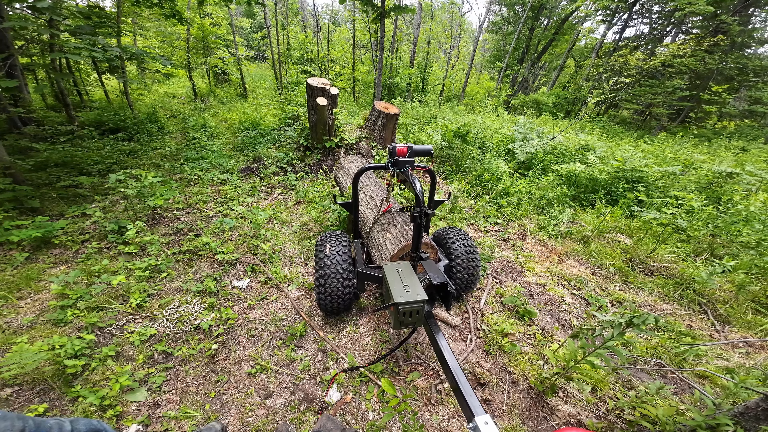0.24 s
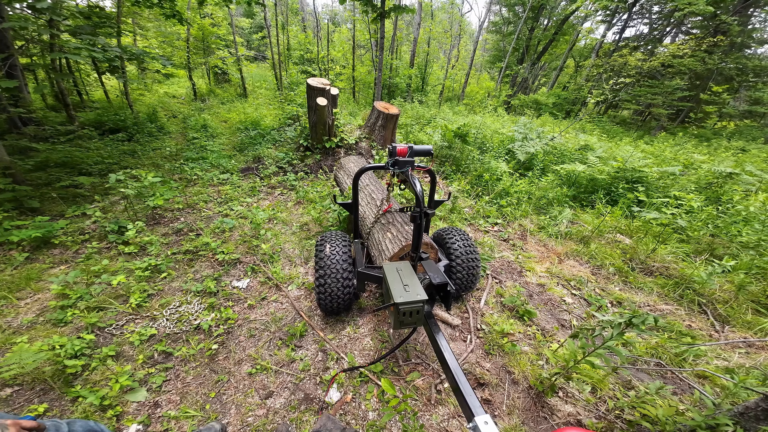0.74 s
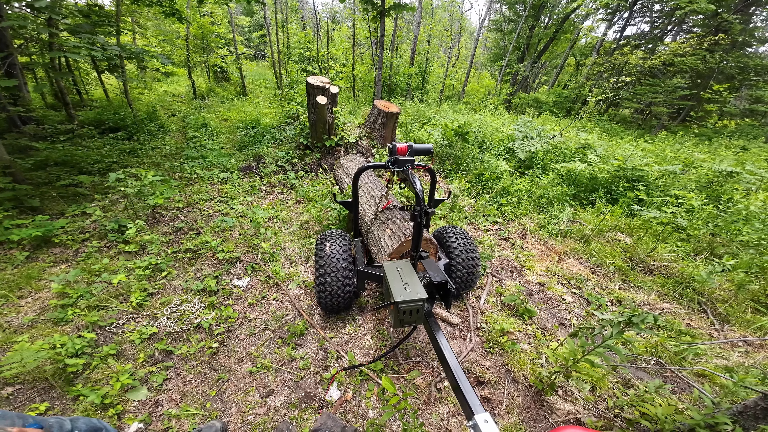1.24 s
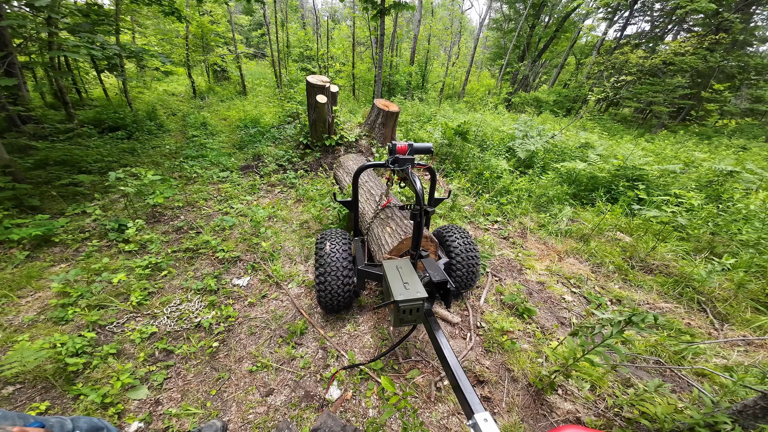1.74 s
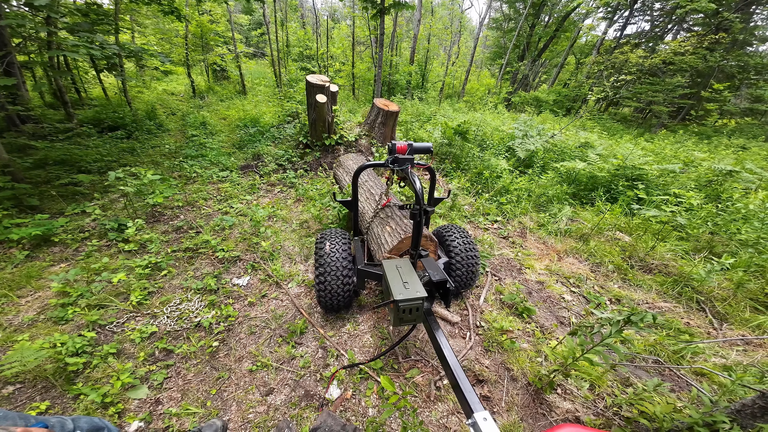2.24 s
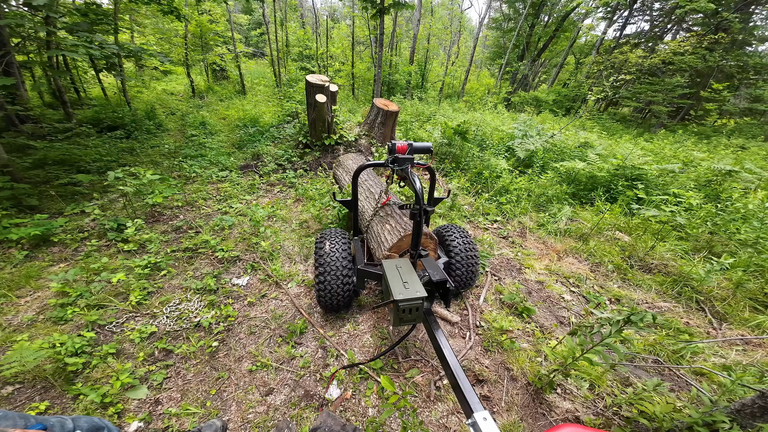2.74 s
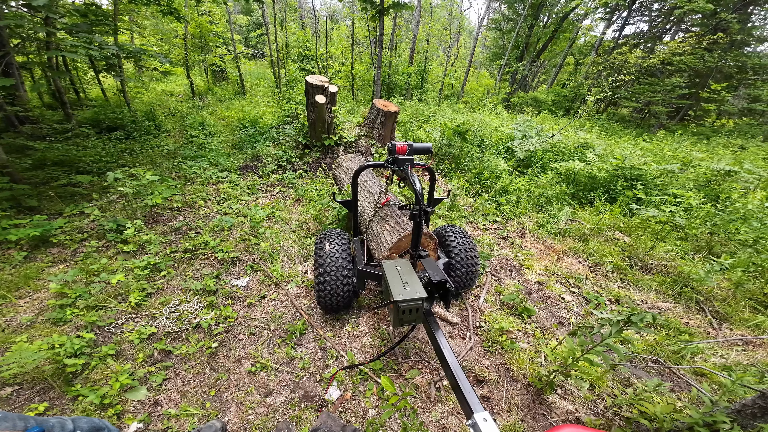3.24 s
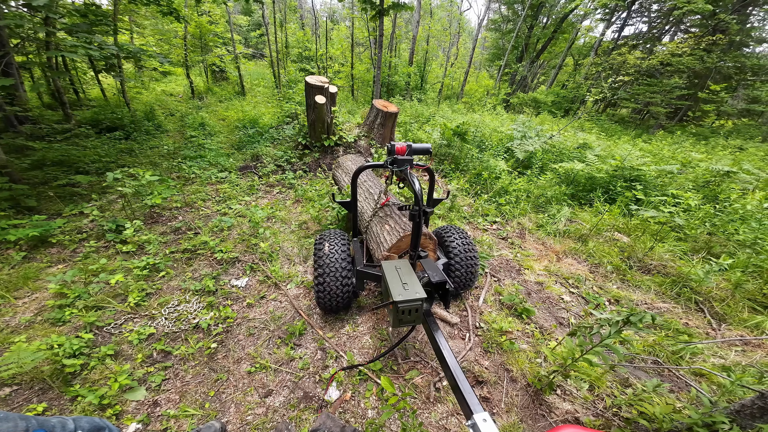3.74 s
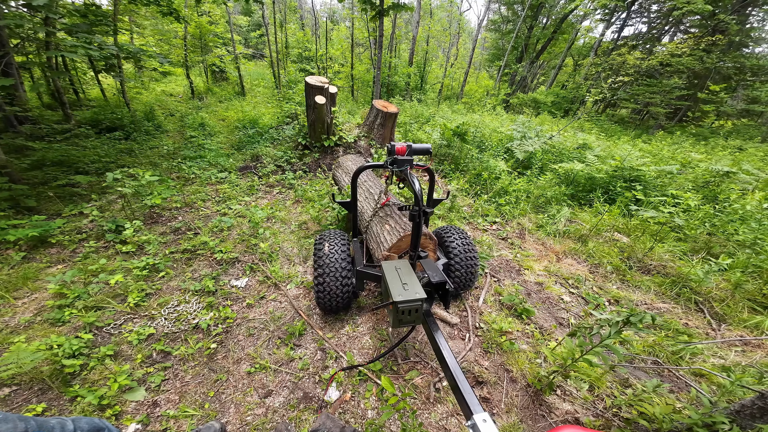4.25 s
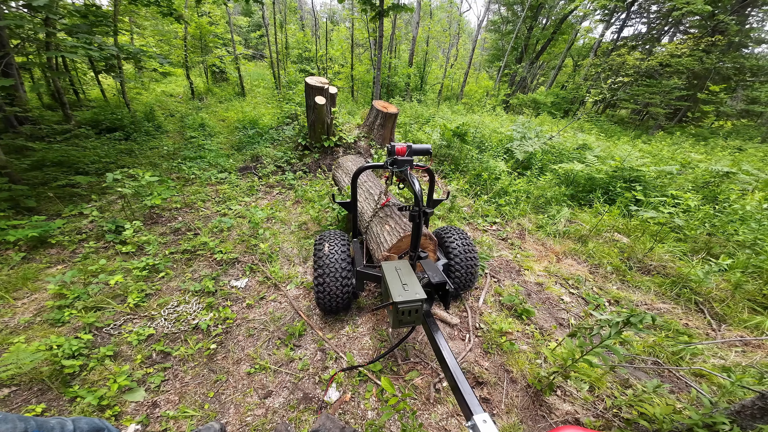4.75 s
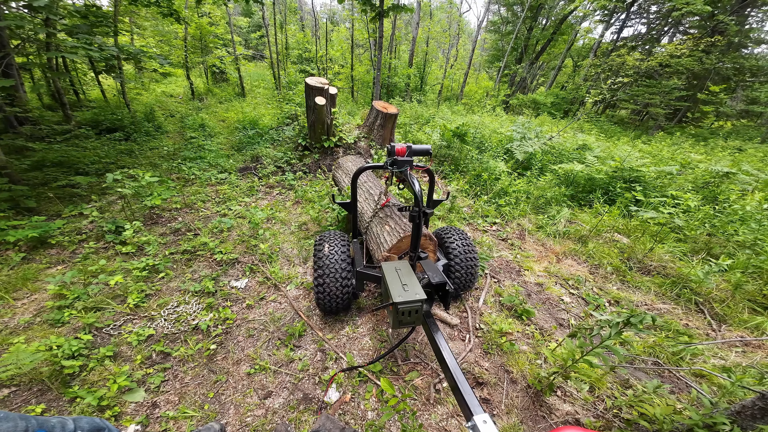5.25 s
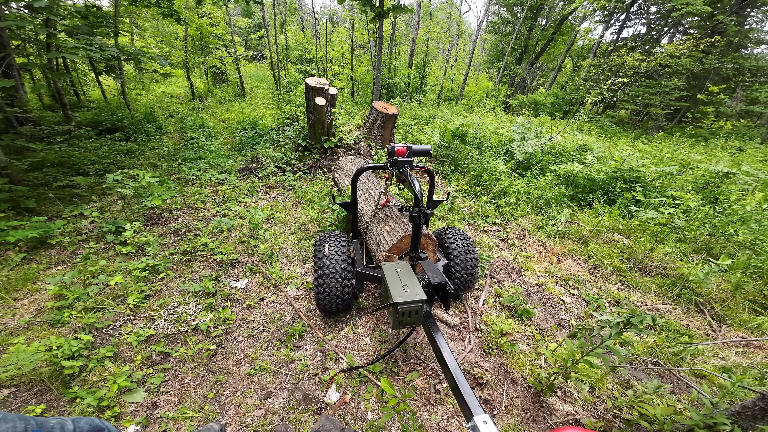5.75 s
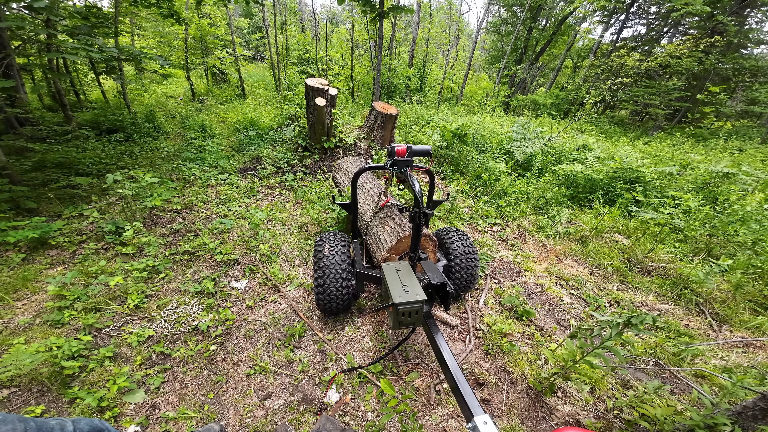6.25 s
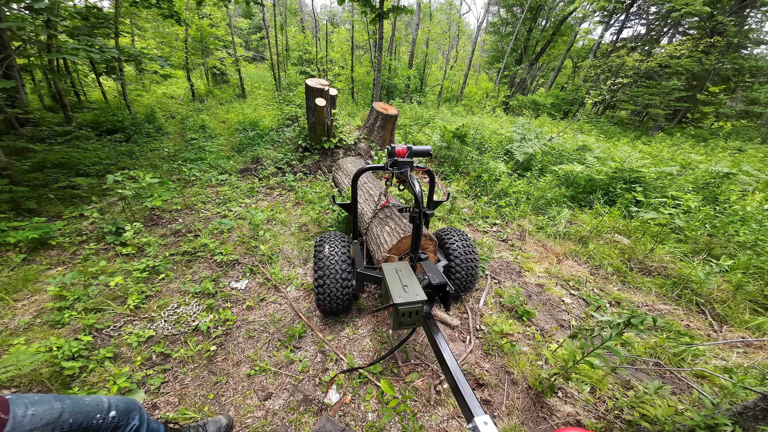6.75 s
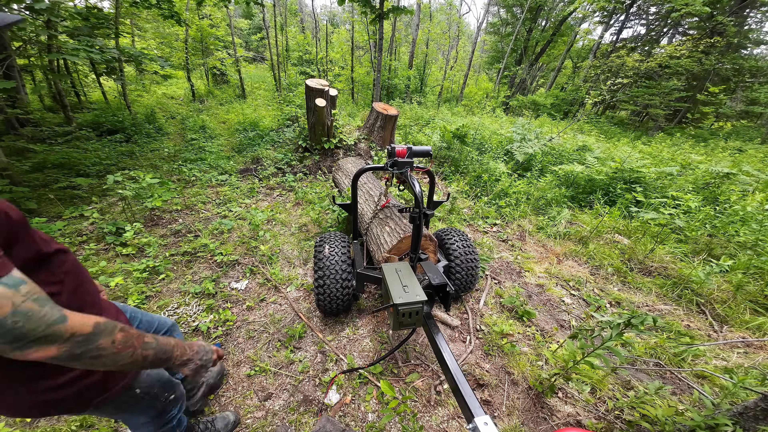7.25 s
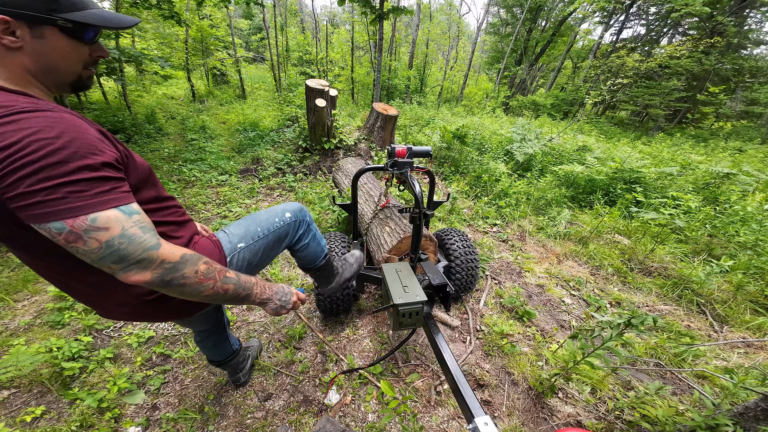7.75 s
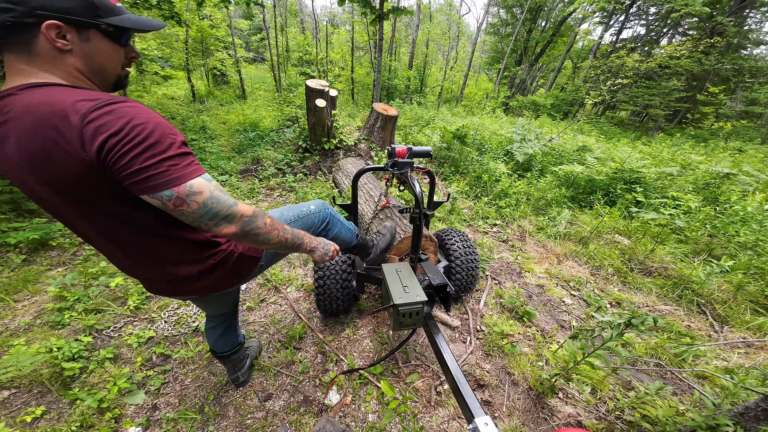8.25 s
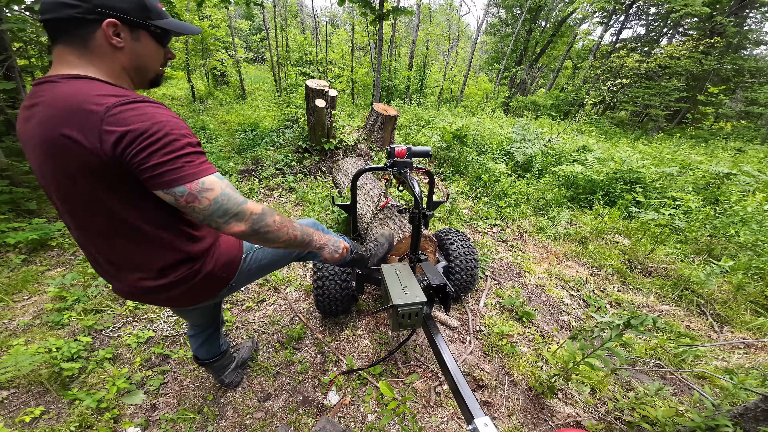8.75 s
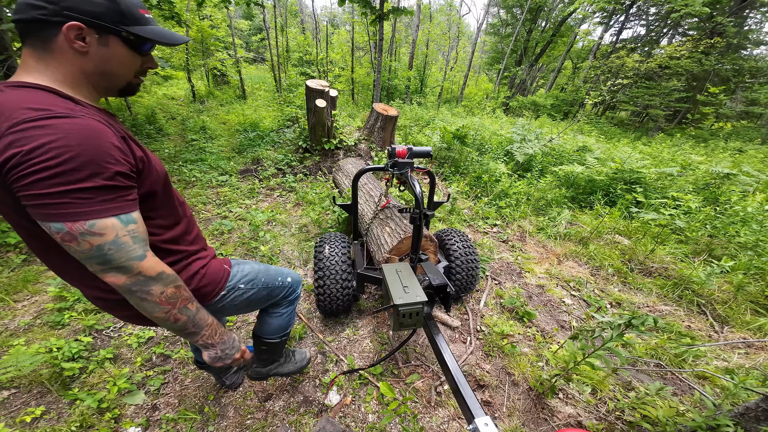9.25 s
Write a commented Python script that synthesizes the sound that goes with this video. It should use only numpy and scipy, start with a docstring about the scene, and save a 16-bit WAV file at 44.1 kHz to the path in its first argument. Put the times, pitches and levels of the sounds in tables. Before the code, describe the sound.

Quiet woodland with a very faint steady hush, heard close in dry stereo. A grinding electric winch is already running and stops at 0.4 s, with log knocks and a momentary dip in level. Four more pulls follow at about 0.85-1.6, 2.2-2.9, 3.5-4.0 and 5.2-5.7 s, each preceded by a switch click. The gritty geared whir wavers and sags under load, lowest in the last pull, with deep shaft booms, wooden clonks around 1.3-1.5 s and soft trailer rocking at starts and stops. Tiny cable ticks dot the pauses. A low hum lingers from 5.8 s and fades; a click comes at 6.5 s and a faint fly buzz at 6.6. From 7.0 s steps crackle in dry litter. Boot knocks cluster at 8.1-8.3 s, the strongest hollow thud lands at 8.7, and smaller knocks, ticks and scuffs continue to 9.5.

```python
"""A grinding winch is already hauling a log onto a small trailer; five short pulls are heard, the motor sagging under load.
Gear noise, periodic with the shaft turn, excites the housing and steel frame; the hum of the shaft booms.
Struck modes make the knocks of the log, noise bursts the clicks of switch and cable, filtered noise the rocking.
A low hum lingers after the last pull and a harmonic buzz is a passing fly; then someone steps through
dry litter, heard as grains of noise, and shoves the log with a boot, so that it knocks in the frame."""
import sys
import numpy as np
from scipy import signal
from scipy.fft import rfft, irfft, next_fast_len
from scipy.io import wavfile
from scipy.ndimage import uniform_filter1d, map_coordinates

SR = 44100
rng = np.random.default_rng(int(sys.argv[2]) if len(sys.argv) > 2 else 0)


def inscribe(sig):
    """Save sig as 16-bit PCM at rate SR to the path in sys.argv[1].

    A 1-D sig is mono; a 2-D sig holds one channel per row.
    Samples are clipped to [-1, 1] before scaling.
    """
    pcm = np.round(np.clip(np.atleast_2d(sig).T, -1, 1) * 32767)
    wavfile.write(sys.argv[1], SR, pcm.astype(np.int16))


N = 419214
TIME = np.arange(N) / SR
STRIKE = SR // 2  # samples in one struck sound


def undb(db):
    """Level to amplitude: 20 dB is a factor of ten."""
    return 10 ** (np.asarray(db) / 20)


def unit(x):
    """Normalization to a root-mean-square value of 1."""
    return x / np.sqrt(np.mean(x ** 2))


def peak(x, db):
    """Normalization to a peak level."""
    return x * undb(db) / np.abs(x).max()


def colour(x, points):
    """Spectral shaping: gains of (pitch_hz, level_db) points, joined on a logarithmic frequency axis."""
    hz, db = np.transpose(points)
    size = next_fast_len(x.shape[-1])
    f = np.maximum(np.fft.rfftfreq(size, 1 / SR), 1)
    gain = undb(np.interp(np.log(f), np.log(hz), db))
    return irfft(rfft(x, size) * gain, size)[..., :x.shape[-1]]


def band(x, lo_hz, hi_hz, order=4):
    """Butterworth band-pass: a flat passband between two slopes."""
    edges = [lo_hz, min(hi_hz, SR / 2 - 1)]
    return signal.sosfilt(signal.butter(order, edges, "band", fs=SR, output="sos"), x)


def resonate(x, hz, width_hz):
    """Simple resonance: a second-order peak with gain 1 at its centre."""
    return signal.lfilter(*signal.iirpeak(min(hz, SR / 2 - 1), hz / width_hz, fs=SR), x)


def walk(rate):
    """Slow fluctuation: random steps at a rate in Hz, smoothed by a moving average, rms 1."""
    k = int(SR / rate)
    steps = np.repeat(rng.standard_normal(N // k + 1), k)
    return unit(uniform_filter1d(steps, k)[:N])


def grains(spread_db, channels=1):
    """Granular noise: dense tiny impacts of very unequal size."""
    size_db = spread_db * np.repeat(rng.exponential(size=(channels, N // 16 + 1)), 16, axis=1)[:, :N]
    return unit(rng.standard_normal((channels, N)) * undb(np.minimum(size_db, 30)))


def fade(t60):
    """Exponential decay: a fall of 60 dB in t60 seconds."""
    return undb(-60 * TIME[:STRIKE] / t60)


def ring(modes, detune=0.043):
    """Modal synthesis: damped sines whose level, pitch and sign vary a little from blow to blow."""
    out = np.zeros(STRIKE)
    for hz, db, t60 in modes:
        harder, sharper, way = rng.standard_normal(3)
        wave = np.sin(2 * np.pi * hz * (1 + detune * sharper) * TIME[:STRIKE])
        out += np.sign(way) * undb(db + 2 * harder) * fade(t60) * wave
    return out


def swell(start, length, attack_s, release_s):
    """Exponential envelope: it rises towards its start, holds and dies away."""
    before = np.minimum(TIME - start, 0)
    after = np.maximum(TIME - start - length, 0)
    return np.exp(before / attack_s - after / release_s)


def stereo(mid, side):
    """Sum and difference: left and right from mid and side."""
    return np.array([mid + side, mid - side])


def shaken(x, lean=0.78, twist=0.78):
    """Phase difference: vibration through the tow bar, stronger on the left and out of step on the right."""
    quadrature = signal.hilbert(x, next_fast_len(len(x))).imag[:len(x)]
    return stereo(x, lean * x + twist * quadrature)


def leaning(x):
    """Level difference: side signal of a trailer sound; its lows lean left, the rest stays nearly central."""
    return undb(1) * colour(x, [(200, -9), (290, -7.0), (420, -12.5), (700, -30)])


def add(out, s, sound):
    """Superposition: mix a sound in at a time."""
    i = int(max(s, 0) * SR)
    out[:, i:i + sound.shape[-1]] += sound[..., :N - i]


# spectrum of the still air of the wood: pitch_hz, level_db
AIR_TONE = [(12, -35), (20, -2), (33, 11), (80, -3.5), (95, -8.5), (129, -18.5), (161, -24.5), (352, -25.5),
            (788, -33.5), (857, -32), (1630, -37), (3350, -41), (15500, -55.5)]


def air(air_db=-62, width=0.46):
    """Steady broadband noise: the faint even hush of the wood."""
    mid, side = colour(rng.standard_normal((2, N)), AIR_TONE)
    gain = undb(air_db + 0.48 * walk(1.614)) / np.std(band(mid, 168, 15000))
    return band(stereo(mid, width * side), 113, 16000, order=2) * gain


# power to the motor, one row for each pull: on_s, off_s, settling_db (drum after the brake), growl_db, hum_db,
# tube_db (ring of the frame's tube), start_rock_db, stop_rock_db
WINCH_PULLS = [(-.1, 0.399, -13.5, -35, -31.5, -57, -29, -35),
               (0.845, 1.613, -16, -35, -30.5, -53, -27.5, -30.5),
               (2.183, 2.878, -16.5, -37.5, -28.5, -58, -28.5, -31),
               (3.526, 4.022, -12, -36, -33.5, -60.5, -33.5, -33.5),
               (5.229, 5.712, -1.5, -35.5, -31.5, -68, -39.5, -32.5)]
# motor speed as the load comes and goes, one curve for each pull: time_s, turns_hz
SPEEDS = [
    [(0.0, 132.5), (0.044, 133.9), (0.098, 121.7), (0.102, 121.5), (0.172, 135.4), (0.222, 133),
     (0.28, 135.7), (0.296, 135.6), (0.346, 126.5), (0.41, 126.7)],
    [(0.87, 132.3), (0.904, 135.5), (0.986, 119.4), (1.036, 136), (1.16, 151.1), (1.334, 121.9),
     (1.382, 144.1), (1.496, 141.2), (1.566, 118), (1.62, 123.7)],
    [(2.21, 122.3), (2.292, 122.1), (2.334, 129.5), (2.47, 115.3), (2.538, 97.9), (2.606, 110.6),
     (2.702, 97.9), (2.772, 122.2), (2.824, 123.5), (2.89, 137.8)],
    [(3.56, 154.2), (3.59, 151.2), (3.606, 149.2), (3.648, 125.8), (3.752, 107.2), (3.78, 103.2),
     (3.854, 111), (3.914, 109.1), (3.968, 109.5), (4.03, 103.2)],
    [(5.25, 153.5), (5.288, 151.4), (5.3, 144.6), (5.346, 112.2), (5.362, 104.8), (5.464, 94.1),
     (5.516, 86.75), (5.602, 87.8), (5.65, 91.84), (5.72, 87.2)],
]
# booms of the frame, where the labouring motor shakes it into resonance: centre_s, half_length_s, level_db
BOOMS = [(0.162, 0.017, -27.5), (1.635, 0.033, -23.5), (2.325, 0.036, -28), (2.547, 0.031, -20.5),
         (2.669, 0.068, -26.5), (3.778, 0.042, -21), (3.933, .04, -14.5), (4.023, 0.06, -24.5),
         (5.402, 0.028, -14.5), (5.474, 0.023, -15.5)]
CRUISE_HZ, GEAR_DB, GEAR_DB_PER_OCTAVE = 116.9, -31, 17.5  # gear level at cruising speed, and its slope
JOLT_DB, JOLT_S = 7, 0.04  # extra growl at the start of a pull, and its decay time


def drive(rise_s=0.039, brake_s=0.014, coast_s=0.061, hum_rise_s=0.097, hum_fall_s=0.058, hiss_follow=0.78):
    """Speed-dependent excitation: motor speed and gains of gears, growl, hiss and hum; a fast brake, slower settling."""
    speed = np.interp(TIME, *np.transpose([point for pull in SPEEDS for point in pull]))
    running, growling, shaking = np.zeros((3, N))
    for on, off, settling_db, growl_db, hum_db, *_ in WINCH_PULLS:
        since, after = np.maximum(TIME - on, 0), np.maximum(TIME - off, 0)
        stopping = np.maximum(np.exp(-after / brake_s), undb(settling_db) * np.exp(-after / coast_s))
        power = np.minimum(since / rise_s, 1) ** 2 * stopping
        running += power
        growling += power * undb(growl_db + JOLT_DB * np.exp(-since / JOLT_S))
        shaking += np.minimum(since / hum_rise_s, 1) * np.exp(-after / hum_fall_s) * undb(hum_db)
    gear_db = GEAR_DB + GEAR_DB_PER_OCTAVE * np.log2(speed / CRUISE_HZ)
    gears = running * undb(gear_db)
    # the brushes keep hissing when the load slows the gears
    hiss = running * undb(hiss_follow * gear_db)
    growl = growling * undb(2 * walk(20))
    booms = sum(undb(db) * np.exp(-((TIME - s) / half_s) ** 2) for s, half_s, db in BOOMS)
    hum = shaking * undb(3 * walk(21.99)) + booms
    return speed, gears, growl, hiss, hum


def teeth(turns, memory=0.919, size=320):
    """Near-periodic excitation: the pattern of tooth impacts returns on each shaft turn and slowly changes."""
    fresh = rng.standard_normal((int(turns[-1]) + 2, size))
    pattern = signal.lfilter([1], [1, -memory], fresh, axis=0).ravel()
    return unit(map_coordinates(pattern, [turns * size], order=3))


# tone of the gearbox: pitch_hz, level_db
GEARBOX_TONE = [(100, -46), (170, 7), (253, -1), (311, -7), (538, 1.5), (756, 3.5), (930, -3), (1230, -3),
                (2020, -6.5), (2180, -3), (2530, -10), (3230, -12), (4540, -24), (10000, -39.5),
                (15500, -49)]
# resonances of the gear housing: pitch_hz, width_hz, level_db
HOUSING_MODES = [(430, 86, -1.5), (542, 23, 0), (631, 22, -32), (800, 140, -8), (1280, 22, -14),
                 (1333, 8, 2.5), (1768, 7.8, 2.5), (2180, 35, 3.5), (2260, 11, -1), (2745, 16, -6),
                 (3150, 86, -1.5), (3340, 19, 2), (3860, 39, 4.5), (5040, 190, 2.5), (5870, 170, 0),
                 (6200, 69, 4.5), (7500, 200, -1), (10020, 510, 3.5)]
# long rings of the steel frame: pitch_hz, level_db, t60_s
FRAME_MODES = [(845.9, -10, 2.0), (1286, -3, 0.59), (1670, -32, 0.47), (2215, -6, 0.4), (2720, -7, 0.46)]


def winch(growl_rough=0.66, gear_rough=0.86, throb=0.17, hiss_db=-22, frame_db=-23.5, hiss_width=0.27, gear_width=0.32):
    """Source and resonator: teeth and brush hiss sound through the housing; the unbalanced shaft shakes the frame."""
    speed, gear_gain, growl_gain, hiss_gain, hum_gain = drive()
    turns = np.cumsum(speed * (1 + 0.00503 * walk(50))) / SR
    shaft = np.sin(2 * np.pi * turns)
    mesh = teeth(turns)
    # sliding contact adds grit that swells once a turn
    scrape, scrape_side = grains(2.08, channels=2) * (1 + throb * shaft)
    sources = np.array([mesh + growl_rough * scrape, mesh + gear_rough * scrape, scrape, scrape_side])
    sources = colour(sources, GEARBOX_TONE)
    body = sources + sum(undb(db) * resonate(sources, hz, width) for hz, width, db in HOUSING_MODES)
    growl = growl_gain * unit(band(body[0], 204.0, 800))
    gears = undb(walk(35)) * gear_gain * unit(band(body[1], 1032, 4090))
    hiss, hiss_side = undb(hiss_db + 1.95 * walk(45)) * hiss_gain * unit(band(body[2:], 5260, 23300))
    # the frame rings on after the motor stops; bandwidth follows from t60
    frame = sum(undb(db) * resonate(growl + gears, hz, np.log(1000) / np.pi / t60) for hz, db, t60 in FRAME_MODES)
    frame = unit(frame) * np.std(gears) * undb(frame_db)
    gear_side = colour(band(body[3], 158, 3600), [(200, 18), (450, -14), (1200, -6.5), (4000, 5)])
    # the two microphones agree least in the deep growl and the high hiss
    side = gear_width * gear_gain * unit(gear_side) + leaning(growl)
    side += hiss_width * colour(hiss_side, [(4500, -7.5), (8000, 4), (14000, 7)])
    return stereo(growl + gears + hiss + frame, side) + shaken(hum_gain * shaft)


def tube(hz=420, build_s=.15, decay_s=.27):
    """Resonant build-up and decay: the frame's lowest note grows during each pull and rings into the pause."""
    level = sum(undb(tube_db) * swell(off, 0, build_s, decay_s) for _, off, *_, tube_db, _, _ in WINCH_PULLS)
    note = unit(np.sin(2 * np.pi * hz * TIME)) * level * undb(walk(6.1))
    return stereo(note, leaning(note))


# spectrum of the rocking trailer: pitch_hz, level_db
ROCK_TONE = [(25, 12), (42, 1), (55, 10.5), (67, 8.5), (80, 2.5), (92, 10.5), (120, 2.5), (170, -14.5),
             (300, -16), (600, -54)]


def rocking(rock_db=-4, sway_db=-6, rest_db=-51, build_s=0.054, settle_s=0.33, knock_db=-6, knock_settle_s=0.23):
    """Energy addition: starts, stops and knocks set the trailer rumbling on its tyres; the sway is in antiphase."""
    pushes = []
    for on, off, *_, start_db, stop_db in WINCH_PULLS:
        for s, db in ((on, start_db), (off, stop_db)):
            pushes.append(undb(db) * swell(s + build_s, 0, build_s, settle_s))
    for s, *_, thud_db in KNOCKS:
        pushes.append(undb(thud_db + knock_db) * swell(s, 0, 0.021, knock_settle_s))
    motion = np.sqrt(undb(rest_db) ** 2 + sum(push ** 2 for push in pushes))
    rumble, apart = unit(colour(rng.standard_normal((2, N)), ROCK_TONE)) * motion * undb(rock_db)
    sway = unit(band(rng.standard_normal(N), 22, 66, order=2)) * motion * undb(sway_db)
    return shaken(rumble, lean=1.0, twist=1.0) + stereo(0, sway + apart)


# knocks of log and boot, levels relative within each part: start_s, clonk_db, clonk_centre_hz, crack_db, thud_db
KNOCKS = [(.11, -31.5, 268, -50, -33), (0.402, -29.5, 341.3, -40, -29.5), (1.27, -18.5, 227.4, -50, -33.5),
          (1.391, -24.5, 226, -50, -44), (1.526, -25, 240.3, -50, -37), (2.335, -27, 245.6, -50, -32),
          (3.049, -45, 279.2, -70, -45), (4.185, -46.5, 220.7, -52, -41.5), (8.087, -29, 474, -38.5, -32.5),
          (8.149, -45, 500, -36.5, -31), (8.191, -22, 545, -38.5, -25), (8.214, -28.5, 440, -44, -24),
          (8.259, -36, 232, -49, -25), (8.626, -33.5, 445, -43, -32), (8.701, -14, 392, -33.5, -18),
          (8.728, -24.5, 300, -53, -18.5), (8.801, -31, 304, -49, -51), (8.884, -35.5, 647, -39.5, -34),
          (8.915, -31, 278, -46.5, -26), (8.978, -36, 355, -36, -33), (9.029, -25.5, 556, -58, -43),
          (9.082, -31, 370, -42, -37.5), (9.419, -34, 638, -50, -46), (9.447, -27, 400, -39.5, -30.5)]
# modes of the log in its cradle: pitch_hz, level_db, t60_s
CLONK_MODES = [(252.6, 1.5, 0.17), (356, 0, 0.052), (422, -5.5, 0.12), (478, -4, 0.08), (605, -4.5, 0.05),
               (674, -1.5, 0.03), (752, -16, 0.13)]
# low modes of the trailer: pitch_hz, level_db, t60_s
THUD_MODES = [(64.9, -3.5, 0.46), (85.05, -7, 0.56), (115, -4, 0.58), (195.3, -7.5, 0.19)]


def knocks(crack_gain_db=3, thud_gain_db=4, crack_t60=0.11, focus_db_per_octave=15, wood_db=-9, wood_t60=0.19):
    """Modal excitation by impact: a blow cracks on bark, rings the log in its cradle and thuds through the trailer."""
    out = np.zeros((2, N))
    for s, clonk_db, centre_hz, crack_db, thud_db in KNOCKS:
        noise = rng.standard_normal((3, STRIKE))
        # the place of the blow favours the modes near its centre frequency
        modes = [(hz, db - focus_db_per_octave * abs(np.log2(hz / centre_hz)), t60) for hz, db, t60 in CLONK_MODES]
        wood = band(noise[0] * fade(wood_t60), centre_hz / 2, centre_hz * 1.33, order=2)
        clonk = peak(peak(ring(modes), 0) + peak(wood, wood_db), clonk_db)
        bark = peak(band(noise[1:] * fade(crack_t60), 970, 1900, order=1), crack_db + crack_gain_db)
        thud = peak(ring(THUD_MODES, detune=0.032), thud_db + thud_gain_db)
        add(out, s, stereo(clonk + bark[0], leaning(clonk) + 0.084 * bark[1]))
        add(out, s, shaken(thud, lean=0.71, twist=0.26))
    return out


# clicks of the hand control, before each later pull and once afterwards, relative levels: start_s, level_db
SWITCH_CLICKS = [(0.706, -36.5), (2.046, -37.5), (3.4, -36.5), (5.103, -37), (6.4715, -38)]
# spectrum of the switch snap: pitch_hz, level_db
SWITCH_TONE = [(300, -19), (700, 4), (1100, -4), (1800, -6), (2400, -6.5), (3200, -1), (4500, -14),
               (6500, -10), (11000, -11), (15000, -44)]
# modes of the switch's plastic case: pitch_hz, level_db, t60_s
SWITCH_CASE = [(1440, -4, .04), (1820, -4.5, 0.045), (2920, -2.5, 0.045)]
# sharp ticks of cable, hook and twigs, alone or in a short run, relative levels:
# start_s, level_db, centre_hz, count (number of ticks)
TICKS = [(0.3205, -31, 3856, 1), (0.919, -23, 9600, 1), (1.3395, -30, 4940, 1), (2.808, -30.5, 3597, 1),
         (2.881, -31, 3595, 1), (3.0504, -45, 6440, 2), (3.2094, -45, 6220, 3), (3.4699, -47, 7500, 2),
         (4.2104, -45.5, 5657, 3), (4.292, -56, 5200, 1), (4.576, -45, 5980, 1), (5.8568, -40.5, 6050, 1),
         (6.2567, -41.5, 6340, 1), (8.2724, -39, 7550, 1), (8.389, -40, 5440, 2), (8.743, -35, 5600, 1),
         (8.9828, -29, 5660, 1), (9.177, -39, 7160, 4), (9.2753, -41.5, 6960, 1), (9.3905, -37, 7140, 1)]
TICK_GAP_S, TICK_FALL_DB = .015, 2.5  # from one tick of a run to the next


def clicks(switch_db=1, switch_t60=0.03, case_db=-6, contact_db=-35, tick_db=2.0, tick_t60=0.019,
           tick_width_hz=3000, tail_db=-27, tail_t60=0.1, width=0.41):
    """Short broadband transients: the switch snaps in its case, contacts spark, cable and twigs tick brightly."""
    out = np.zeros((2, N))
    for s, db in SWITCH_CLICKS:
        mid, side = colour(rng.standard_normal((2, STRIKE)) * fade(switch_t60), SWITCH_TONE)
        snap = peak(mid, db + switch_db) + peak(ring(SWITCH_CASE, detune=0.0041), db + case_db)
        add(out, s, stereo(snap, peak(side, db - 5.5))[:, :SR // 4])
    # the contacts spark as the motor starts
    bursts = [(on + 0.0095, contact_db, 6000) for on, *_ in WINCH_PULLS if on > 0]
    for s, db, hz, count in TICKS:
        bursts += [(s + k * TICK_GAP_S, db - k * TICK_FALL_DB, hz) for k in range(round(count))]
    for s, db, hz in bursts:
        burst = rng.standard_normal((2, STRIKE)) * (fade(tick_t60) + undb(tail_db) * fade(tail_t60))
        mid, side = band(resonate(burst, hz, tick_width_hz), 3700, 15000)
        add(out, s, stereo(peak(mid, db + tick_db), width * peak(side, db + tick_db)))
    return out


def drone(start_s=5.78, hz=90, waver=0.0091, first_db=-40, first_s=0.062, linger_db=-50, hold_s=0.95, linger_s=0.5):
    """Two-stage decay: after the last pull a low wavering hum drops quickly, hangs on and slowly dies away."""
    level = undb(first_db) * swell(start_s, 0, .02, first_s)
    level += undb(linger_db) * swell(start_s, hold_s, .02, linger_s)
    phase = 2 * np.pi * np.cumsum(hz * (1 + waver * walk(8))) / SR
    return shaken(unit(np.sin(phase)) * level * undb(2 * walk(3.49)), lean=0.83, twist=1.0)


def fly(nearest_s=6.62, hz=184, sink_hz_per_s=42, fly_db=-55.5, approach_s=.16, leave_s=0.064, db_per_octave=-6.0):
    """Harmonic series: a wingbeat buzz of seven partials swells and sinks in pitch as the fly passes."""
    wingbeat = hz - sink_hz_per_s * np.clip(TIME - nearest_s, -.5, .5)
    phase = 2 * np.pi * np.cumsum(wingbeat * (1 + 0.0079 * walk(25))) / SR
    buzz = unit(sum(undb(db_per_octave * np.log2(k)) * np.sin(k * phase) for k in range(1, 8)))
    return buzz * undb(fly_db) * swell(nearest_s, 0, approach_s, leave_s)


# boots and clothes brushing through litter and over bark, relative levels: start_s, length_s, level_db, tread_db
SCUFFS = [(6.997, .006, -54, -59), (7.093, 0.0091, -59, -60), (7.177, 0.011, -53, -70),
          (7.426, .02, -59, -62), (7.464, 0.013, -48.5, -55.5), (8.097, 0.081, -57.5, -48),
          (8.383, 0.011, -66, -51), (8.632, 0.12, -59.5, -51.5), (8.789, 0.017, -53.5, -53),
          (8.967, 0.011, -59, -48), (9.17, 0.065, -60.5, -59.5), (9.445, 0.054, -49, -53)]
# spectrum of the dry litter: pitch_hz, level_db
RUSTLE_TONE = [(240, -30), (400, -20), (1000, -20), (1340, -16), (2800, -15), (4350, -21.5), (5560, -15),
               (8670, -21.5), (9790, -13.5), (13300, -33), (15500, -30)]


def rustle(rustle_db=-1, width=0.52, crackle_db=3.9, attack_s=0.0095, release_s=0.043):
    """Granular friction noise: dry litter and bark crackle under the boots, over the dull sound of the tread."""
    brushing, treading = np.zeros((2, N))
    for s, length, level_db, tread_db in SCUFFS:
        step = swell(s, length, attack_s, release_s)
        brushing += undb(level_db) * step
        treading += undb(tread_db) * step
    mid, side = unit(colour(grains(crackle_db, channels=2), RUSTLE_TONE))
    tread = unit(band(rng.standard_normal(N), 200, 700, order=1))
    return stereo(mid, width * side) * brushing * undb(rustle_db) + tread * treading


def scene():
    """Superposition of winch, trailer and wood; the level dips briefly during the first pull."""
    dip = undb(-20 * swell(.304, .012, .0005, .002))
    trailer = winch() + tube() + rocking() + knocks() + clicks() + drone()
    return (air() + trailer + fly() + rustle()) * dip


# response of the microphones: pitch_hz, level_db
MIC_RESPONSE = [(10500, 0), (11500, 1), (12700, -12.5), (16000, -4)]


def record(dry):
    """Linear filtering: the microphones dull the treble, and a steep low-pass cuts the top above 16 kHz."""
    low_pass = signal.ellip(10, .2, 80, 16000, fs=SR, output="sos")
    return signal.sosfilt(low_pass, colour(dry, MIC_RESPONSE))


dry = scene()
out = record(dry)
inscribe(out)
```